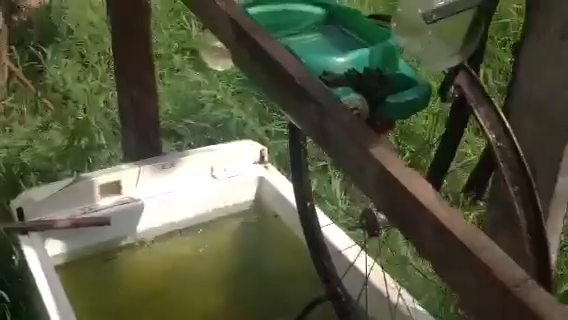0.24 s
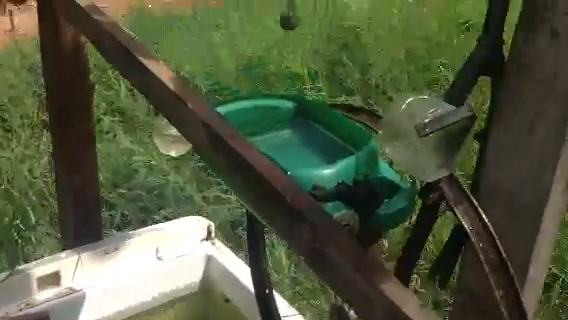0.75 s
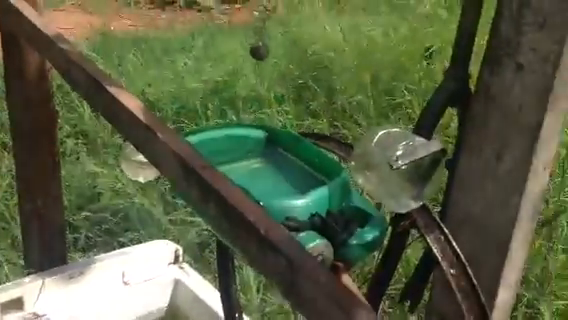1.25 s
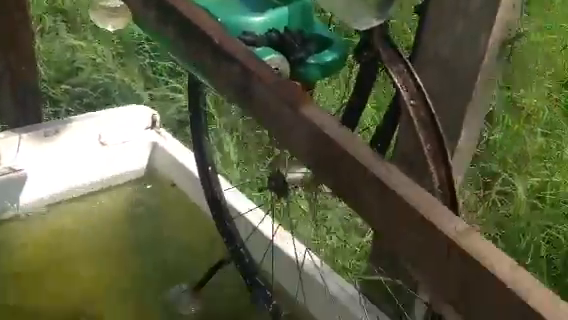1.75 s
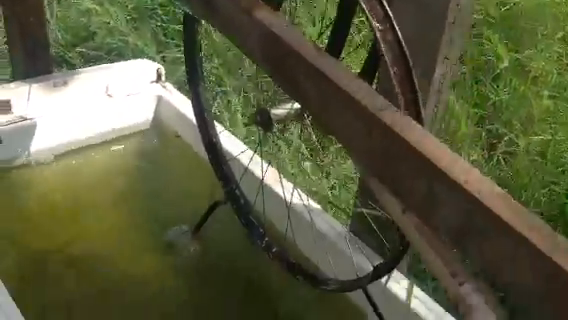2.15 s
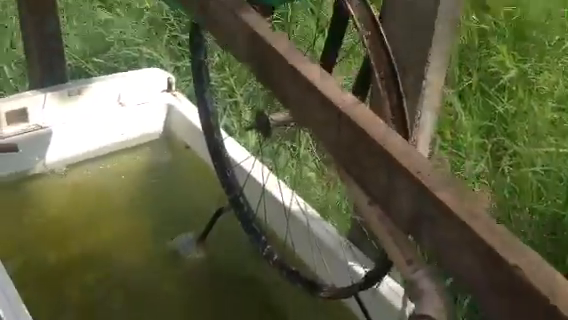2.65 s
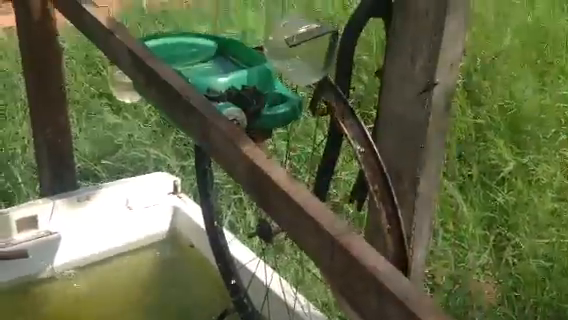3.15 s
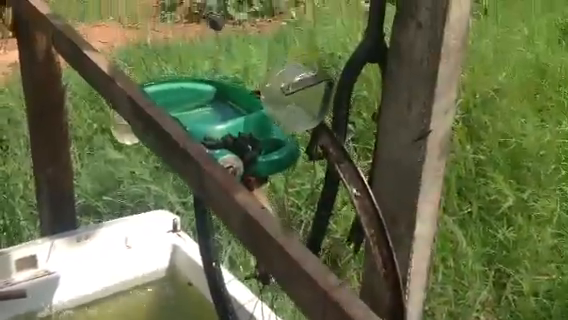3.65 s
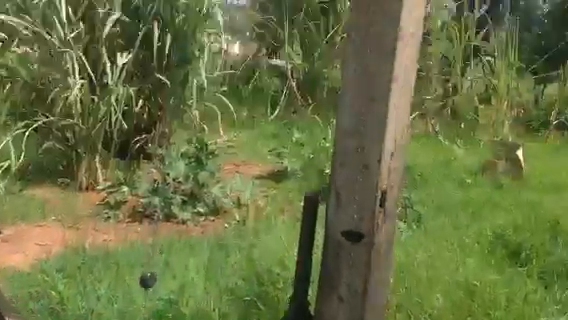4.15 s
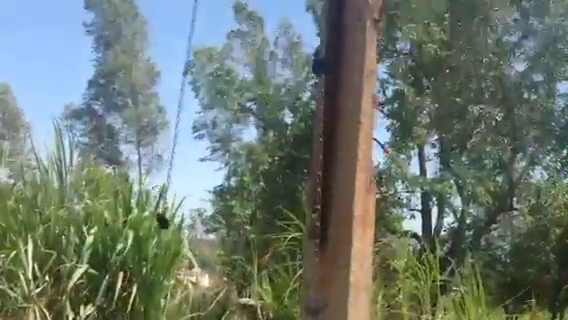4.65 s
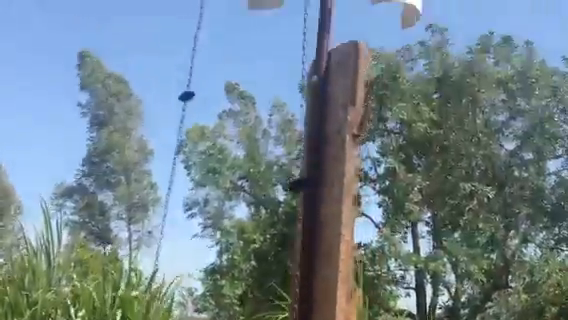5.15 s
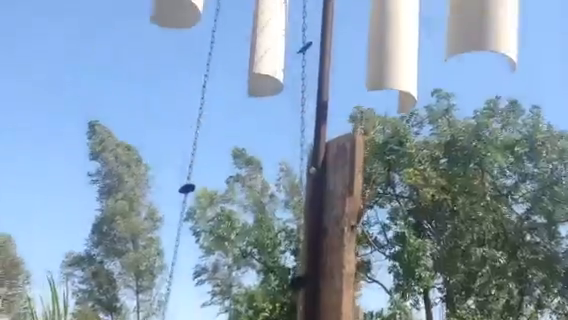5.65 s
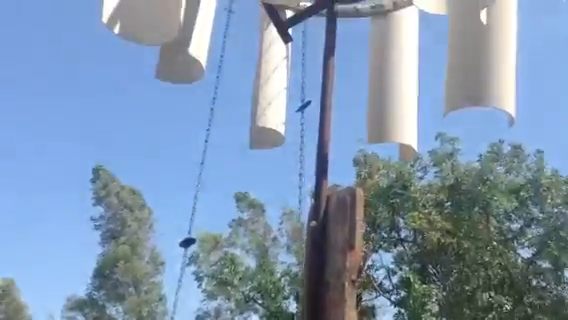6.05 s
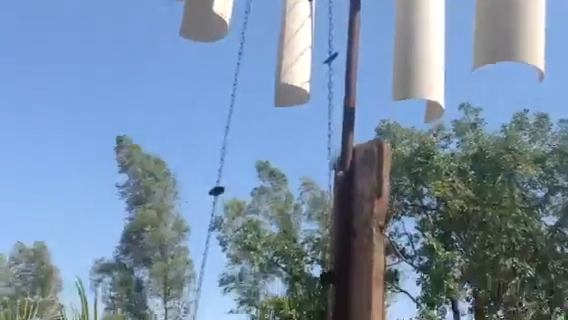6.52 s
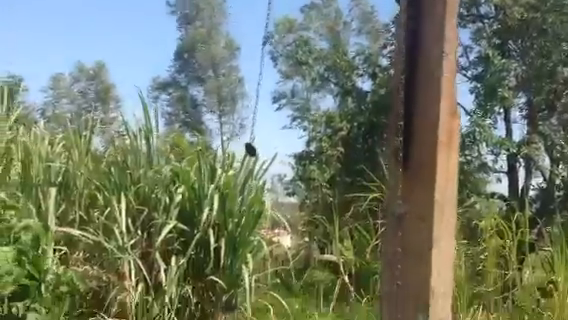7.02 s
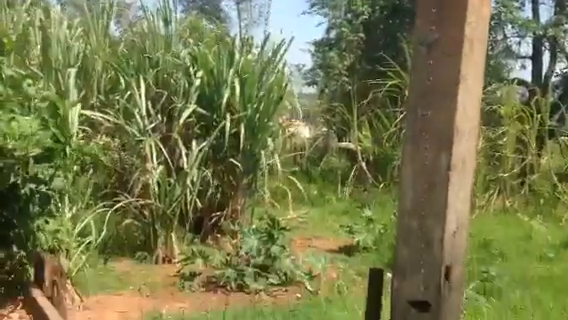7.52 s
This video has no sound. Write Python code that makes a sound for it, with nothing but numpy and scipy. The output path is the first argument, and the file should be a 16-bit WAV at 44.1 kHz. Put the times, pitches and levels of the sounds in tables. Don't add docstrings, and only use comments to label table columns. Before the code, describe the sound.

Open air, handheld microphone near a plastic tub. From 0 s water trickles in: a steady bright fizz, a soft low gurgle, ticking drops and small bubble plops, with a strong splash at 0.2 s and lesser ones near 0.7 and 1.0. A far bird gives a short, thin whistled call at 0.6, repeated at 2.0, 3.5, 4.7 and 6.8 s. The spray brightens around 1.6-1.8; another sharp splash comes at 2.6. Low wind bumps begin lightly, build from 2.8 and become by far the loudest sound between 3.7 and 4.7, lumpy and fluttering, with a final hard thump at 5.5. The fizz drops at 3.75 as the microphone turns away. Leaves hiss and crackle around 4 s; hand creaks and snaps cluster at 4.8-5.2 and 5.8-5.9, with a splash at 5.3. Gusts weaken after 6.5, and leaves stir again near 7.7 as the water returns slightly.

```python
import sys
import numpy as np
from scipy import signal
from scipy.fft import rfft, irfft, next_fast_len
from scipy.io import wavfile
from scipy.ndimage import uniform_filter1d, map_coordinates

SR = 44100
rng = np.random.default_rng(int(sys.argv[2]) if len(sys.argv) > 2 else 0)


def to_linear_factor(level_db):
    exponent = np.asarray(level_db, float) / 20
    return 10 ** exponent


def wav_record(signal):
    frames = np.transpose(np.atleast_2d(signal))
    bounded = np.clip(frames, -1, 1)
    quanta = np.round(bounded * 32767).astype(np.int16)
    wavfile.write(sys.argv[1], SR, quanta)


N = 343098
TOP_HZ = 15400

# time in seconds, change of the spray in dB.
AIM = [(0.0, 0.5), (0.27, -1.5), (1.26, -1.5), (1.53, -2.5), (1.6, -1.5), (1.83, -1.5), (2.0, -1.5),
       (3.59, -3.5), (3.73, -2), (3.77, -10), (4.69, -10), (6.47, -11.5), (7.45, -11), (7.78, -8)]
# crest in seconds, buffet level in dB, length in seconds, brightness in dB.
GUSTS = [(0.216, -44.5, 0.058, -22), (0.869, -55, 0.073, -10), (1.121, -57, 0.048, -8),
         (1.497, -37.5, 0.041, -11), (1.919, -41.5, 0.05, -23), (2.092, -41, 0.032, -18),
         (2.338, -37.5, 0.057, -25), (2.767, -30, 0.084, -23), (2.978, -35.5, 0.12, -23),
         (3.122, -29.5, 0.11, -10), (3.183, -29.5, 0.052, -8.5), (3.328, -31, 0.13, -12),
         (3.592, -26.5, 0.074, -18), (3.873, -23, 0.12, -8.5), (3.99, -24.5, .12, -2),
         (4.115, -29.5, 0.1, -4.5), (4.414, -22, 0.075, -3.5), (4.62, -22, 0.12, -3.5),
         (4.857, -26, 0.055, -9.5), (4.955, -30, .05, -9), (5.226, -30, 0.11, -9.5),
         (5.504, -19.5, 0.091, -7), (6.18, -40.5, 0.053, -12), (6.3, -41, 0.14, 0),
         (6.475, -24.5, 0.037, -7), (6.821, -43.5, 0.055, -18), (7.049, -40.5, 0.043, -24),
         (7.198, -40, 0.065, -10), (7.377, -34.5, 0.028, -5.5), (7.76, -37, 0.036, -13)]


def unit(x):
    return x / np.sqrt(np.mean(x ** 2) + 1e-20)


def curves(rows):
    s, *cols = np.transpose(rows)
    return [np.interp(np.arange(N) / SR, s, c) for c in cols]


def wobble(rate):
    knots = rng.standard_normal(int(N * rate / SR) + 4)
    return map_coordinates(knots, [np.arange(N) * rate / SR])


def coloured(x, spectrum):
    size = next_fast_len(N + 8192)
    hz, db = np.transpose(spectrum)
    gain_db = np.interp(np.log(np.fft.rfftfreq(size, 1 / SR) + 1), np.log(hz), db)
    return unit(irfft(rfft(x, size) * to_linear_factor(gain_db), size)[:N])


def patchy(depth_db):
    z = signal.stft(rng.standard_normal(N), nperseg=256)[2]
    field = uniform_filter1d(rng.standard_normal(z.shape), size=9, axis=0)
    field = uniform_filter1d(field, size=12, axis=1)
    return signal.istft(z * to_linear_factor(depth_db * unit(field)), nperseg=256)[1][:N]


def rings(s, db, hz, cycles, rise, glide, size):
    t = np.arange(size) / SR
    age = t * np.asarray(hz)[:, None] / cycles
    tone = np.sin(2 * np.pi * cycles * age * (1 + glide * age))
    wave = tone * np.exp(-age) * (1 - np.exp(-age / rise))
    at = np.round(np.asarray(s) * SR).astype(int)[:, None] + np.arange(size)
    return np.bincount(at.ravel(), (to_linear_factor(db)[:, None] * wave).ravel(), N + size)[:N]


def shower(count, hz, spread, size_db, cycles, glide, size):
    pick = rng.random((count, 2))
    pitch = np.clip(hz * np.exp(spread * rng.standard_normal(count)), 100, SR / 3)
    rank = np.minimum(-np.log(1 - pick[:, 1]), 4)
    return unit(rings(pick[:, 0] * N / SR, size_db * rank, pitch, cycles, 0.5, glide, size))


def puffs(s, db, hz, cycles):
    k = np.arange(-1300, 1300)
    turns = k / SR * hz[:, None]
    start = rng.random((len(s), 1))
    wave = to_linear_factor(db)[:, None] * np.exp(-(turns / cycles) ** 2) * np.cos(2 * np.pi * (turns + start))
    at = np.round(s * SR).astype(int)[:, None] + k
    return np.bincount(at.ravel(), wave.ravel(), N)[:N]


def swells(s, db, length):
    fall_db, rise_share = 11, 0.85
    t = np.arange(0, N + 64, 64) / SR - np.asarray(s)[:, None]
    away = np.where(t < 0, -t / rise_share, t) / np.asarray(length)[:, None]
    power = np.sum(to_linear_factor(2 * (np.asarray(db)[:, None] - fall_db * away)), axis=0)
    return np.interp(np.arange(N), np.arange(len(power)) * 64, 10 * np.log10(power + 1e-12))


def joined(a_db, b_db):
    return 10 * np.log10(to_linear_factor(2 * a_db) + to_linear_factor(2 * b_db))


def water():
    # pitch in Hz, level in dB.
    spray_tone = [(2500, -16), (4500, -6.5), (6500, -3), (9000, 0.5), (11500, 0), (13500, -2.5),
                  (15500, -6)]
    gurgle_tone = [(120, -8), (300, 0.5), (420, 2), (540, 3), (750, -1.5), (1100, -3), (1550, -3),
                   (1750, -8.5), (2500, -46)]
    # start in seconds, level in dB, pitch in Hz.
    bubbles = [(0.056, -44.5, 1350), (0.329, -49, 1270), (0.349, -49, 1016), (0.489, -49, 1075),
               (0.628, -49, 1200), (0.657, -46, 1160), (0.761, -50, 1350), (0.912, -50, 960),
               (1.055, -51, 1940), (1.333, -46.5, 1120), (1.354, -52, 1600), (1.5, -47, 970),
               (1.557, -46, 2640), (2.08, -50, 1350), (2.213, -48, 1270), (2.294, -46, 1010),
               (2.387, -47, 1380), (2.439, -49, 1460), (2.547, -48, 1150), (2.832, -51, 1210),
               (2.97, -52, 1400), (3.583, -43.5, 2360), (3.722, -47, 1420), (4.102, -51, 1440),
               (4.752, -49, 1720), (4.848, -47, 838), (5.951, -48, 1400), (6.468, -54, 1024),
               (7.748, -46.5, 950),
               (.079, -52, 1480), (.137, -49.5, 1300), (.472, -56, 1340), (.51, -55, 1270),
                     (1.07, -55, 1180), (1.407, -50, 1000), (1.69, -56, 1260), (1.727, -54, 1350),
                     (1.807, -53, 1260), (2.308, -51, 1370), (2.669, -56, 1260), (3.524, -55, 1100),
                     (6.273, -55, 1540), (6.784, -56, 1270)]
    # start in seconds, level in dB, pitch in Hz, life in cycles.
    tub_ring = (1.495, -45, 485, 32)

    aim_db, = curves(AIM)
    droplets = shower(count=1800, hz=9450, spread=0.27, size_db=6.0, cycles=0.89, glide=0, size=48)
    fizz = unit(coloured(patchy(0.93), spray_tone) + to_linear_factor(-12.0) * droplets)
    fizz_db = -47.5 + aim_db + 0.77 * wobble(9) + 0.61 * wobble(35)

    small_bubbles = shower(count=900, hz=1100.5, spread=0.3, size_db=3.0, cycles=7.7, glide=0.015, size=1400)
    gurgle = unit(coloured(patchy(0.73), gurgle_tone) + to_linear_factor(-9.0) * small_bubbles)
    gurgle_db = -52.5 + 0.22 * aim_db

    s, db, hz = np.transpose(bubbles)
    plops = rings(s, db + 8.5, hz * 0.97, cycles=8.1, rise=0.44, glide=0.016, size=2200)
    s, db, hz, cycles = tub_ring
    plops += rings([s], [db], [hz], cycles, rise=0.12, glide=0, size=8000)
    return to_linear_factor(fizz_db) * fizz + to_linear_factor(gurgle_db) * gurgle + plops


def ticks():
    # start in seconds, level in dB, pitch in Hz.
    drops = [(0.128, -49, 4150), (0.181, -47.5, 3060), (0.267, -50, 7920), (0.555, -47, 5860),
             (0.854, -38.5, 9990), (1.017, -49, 11370), (1.358, -49, 11020), (1.466, -43, 9990),
             (1.499, -46, 5000), (1.575, -47, 9990), (1.812, -45, 9650), (2.035, -40, 14810),
             (2.106, -42, 11400), (2.117, -47, 11500), (2.623, -37, 10680), (2.835, -37, 8200),
             (3.278, -49, 8960), (3.333, -47, 8610), (3.789, -48, 9550), (3.899, -55, 9650),
             (3.965, -50, 10680), (4.498, -51, 8800), (4.733, -49.5, 6890), (4.75, -53, 10340),
             (5.007, -53.5, 2790), (5.069, -54, 3100), (5.524, -51, 6600), (5.852, -54, 5510),
             (6.003, -55, 4820), (6.501, -54, 5170)]
    # time in seconds, peak in dB, pitch in Hz.
    specks = [(0.089, -34, 10070), (0.099, -35, 7428.0), (0.166, -42, 10026.0), (0.187, -37, 9595.0),
              (0.206, -35, 8206.0), (0.545, -40.0, 7927.0), (0.87, -37, 6760.0), (1.289, -40.0, 8791.0),
              (1.316, -42.0, 8650.0), (1.598, -38.0, 9279.0), (1.618, -39.0, 10204.0), (1.708, -35, 9472.0),
              (1.961, -40.0, 11820.0), (1.995, -40.0, 9775.0), (2.352, -43, 7682.0), (2.639, -38, 9202.0),
              (2.731, -37, 9924.0), (2.749, -39, 9071.0), (2.846, -41.0, 8479.0), (2.974, -38, 11998.0),
              (2.992, -40.0, 8563.0), (3.107, -38, 11079.0), (3.198, -39, 9298.0), (3.688, -40.0, 8301.0),
              (3.725, -40, 9877.0), (3.78, -42, 7427.0), (3.856, -43, 9387.0), (4.0, -44.0, 8222.0),
              (4.176, -45.0, 7680.0), (4.19, -44, 11186.0), (4.201, -46.0, 6801.0), (4.323, -49, 8119.0),
              (4.524, -46.0, 7568.0), (4.574, -45, 7555.0), (4.696, -43, 10157.0), (4.888, -47.0, 11253.0),
              (4.933, -48.0, 9530.0), (5.017, -45.0, 6307.0), (5.157, -47, 6755.0), (5.457, -50, 8089.0),
              (6.213, -50, 7148.0), (6.256, -47.0, 6656.0), (6.275, -47.0, 9561.0), (6.51, -49.0, 10091.0),
              (6.783, -49.0, 10014.0), (6.837, -48.0, 7615.0), (7.149, -49.0, 10051.0),
              (7.209, -48.0, 10713.0), (7.316, -46.0, 9610.0), (7.496, -46.0, 11640.0)]
    # start in seconds, peak in dB, pitch in Hz.
    splashes = [
        (0.1795, -19.5, 10000),
        (0.651, -27, 8250),
        (0.9847, -28, 9900),
        (2.582, -23, 11700),
        (5.262, -25, 11500),
        (7.7484, -47, 8270),
    ]
    # start in seconds, peak in dB, pitch in Hz.
    snaps = [(3.705, -37, 4950), (4.496, -35, 5750), (4.7666, -36, 3050), (4.777, -38, 2940),
             (4.784, -34, 3000), (4.797, -34, 3500), (4.808, -35, 2130), (4.825, -34, 2520),
             (4.838, -36, 3500), (4.9994, -38, 4020), (5.1307, -30, 3150), (5.1404, -38, 3610),
             (5.1645, -30.5, 3180), (5.18, -30, 5400), (5.1977, -28, 5260), (5.2609, -37, 3790),
             (5.7966, -32.5, 2000), (5.899, -32, 2890), (5.9264, -27, 4640), (6.7371, -48, 4810),
             (7.756, -38, 2470)]

    s, db, hz = np.transpose(drops)
    out = rings(s, db + 11, hz, cycles=hz[:, None] * 0.00091, rise=0.073, glide=0, size=256)
    second_hz = np.clip(hz * rng.uniform(0.69, 1.2, len(s)), 0, TOP_HZ)
    out += rings(s, db + 8.0, second_hz, cycles=4.6, rise=0.053, glide=0, size=256)

    s, db, hz = np.transpose(specks)
    out += rings(s - 0.0003, db + 7.0, hz, cycles=2.6, rise=0.08, glide=0, size=128)

    s, db, hz = np.transpose(splashes)
    for shift in (0.7, 0.85, 0.99, 1.15, 1.35):
        late = rng.uniform(0, 0.00028, len(s))
        part_hz = np.clip(hz * shift, 0, TOP_HZ)
        out += rings(s + late, db - 7.0, part_hz, cycles=4.0, rise=0.09, glide=0, size=256)

    s, db, hz = np.transpose(snaps)
    out += rings(s, db + 13.5, np.sqrt(hz * 6000), cycles=0.26, rise=0.12, glide=0, size=128)
    rattle = rings(s + 0.0005, db - 6, hz, cycles=3.1, rise=0.2, glide=0, size=256)
    return out + rattle


def eddies():
    # time
    # in seconds, peak in dB, pitch in Hz.
    lone_eddies = [(0.135, -37, 153), (0.449, -36, 170), (1.305, -39.5, 164), (1.536, -31.5, 175),
                   (1.72, -35.5, 181), (1.825, -33, 171), (1.865, -36, 186), (1.993, -39, 169),
                   (2.229, -31.5, 212), (2.384, -32.5, 171), (2.802, -24, 240), (3.062, -27, 223),
                   (3.605, -19, 208), (3.739, -18.5, 286), (3.832, -14, 247), (3.905, -15.5, 273),
                   (4.372, -13.5, 216), (4.558, -11.5, 241), (5.505, -9, 272), (5.595, -22, 220),
                   (5.749, -31.5, 184), (5.865, -30, 207), (5.905, -27.5, 304), (6.083, -27.5, 192),
                   (6.354, -24.5, 250), (6.425, -28, 212), (6.531, -26, 220), (6.79, -29.5, 208),
                   (7.23, -30.5, 200), (7.285, -29.5, 186)]
    crowding_eddies = [(1.51, -27, 175.0), (2.063, -36.0, 183.0), (2.823, -26, 230), (3.086, -33, 221.0),
                       (3.113, -25.5, 249.0), (3.204, -26, 270.0), (3.234, -28.0, 175), (3.341, -24.5, 219),
                       (3.383, -23.5, 248), (3.518, -28, 193), (3.561, -22.0, 211.0), (3.623, -23.5, 174.0),
                       (3.667, -23, 193.0), (3.716, -23, 230.0), (3.794, -20.5, 217.0), (3.812, -20, 231.0),
                       (3.853, -22, 285), (3.967, -24, 240.0), (4.008, -19.0, 228), (4.024, -23, 245.0),
                       (4.061, -22, 211.0), (4.1, -21, 186), (4.147, -17, 198.0), (4.163, -32, 217.0),
                       (4.203, -22, 228.0), (4.224, -24, 250.0), (4.304, -22.5, 201.0), (4.319, -22, 248.0),
                       (4.339, -24, 198.0), (4.432, -17, 265.0), (4.448, -15, 255.0), (4.467, -22, 191.0),
                       (4.53, -16, 249.0), (4.578, -16, 174), (4.599, -21.0, 260), (4.651, -18, 297.0),
                       (4.687, -21, 250), (4.705, -22.0, 198), (4.737, -19, 249.0), (4.974, -23.5, 177.0),
                       (5.059, -24.5, 200.0), (5.079, -29, 225.0), (5.19, -23, 196.0), (5.21, -20.5, 220.0),
                       (5.233, -27, 227), (5.249, -24.0, 213.0), (5.269, -24, 221.0), (5.334, -21, 276),
                       (5.474, -16, 256), (5.531, -16.5, 238), (5.543, -17, 254.0), (5.793, -32.5, 192.0),
                       (5.931, -30, 184.0), (6.287, -25.0, 213), (6.321, -29.0, 202.0), (6.454, -20, 222),
                       (6.586, -29, 214), (6.722, -29, 217), (6.831, -30.5, 205), (7.363, -32, 246.0)]
    sharp_flicks = [(3.183, -31, 474.0), (3.205, -37.0, 486.0), (3.584, -39, 480.0), (3.706, -34, 625),
                    (3.739, -26, 474.0), (3.806, -32, 481.0), (3.827, -24, 497.0), (3.863, -31, 489.0),
                    (3.903, -17.5, 475), (3.916, -24, 526.0), (3.945, -32, 570.0), (3.954, -33, 572.0),
                    (3.966, -19, 557.0), (3.982, -24, 570), (3.994, -32, 657.0), (4.016, -27, 506.0),
                    (4.047, -29.0, 484.0), (4.078, -26, 570.0), (4.103, -29.0, 471.0), (4.118, -21, 492.0),
                    (4.13, -22, 515), (4.163, -32, 554), (4.223, -23.5, 530.0), (4.258, -29.5, 491.0),
                    (4.362, -31, 619.0), (4.377, -22, 565.0), (4.387, -27.0, 547.0), (4.414, -29, 520.0),
                    (4.426, -21, 566.0), (4.437, -27, 590.0), (4.45, -28, 518.0), (4.464, -25, 498.0),
                    (4.522, -19.5, 508.0), (4.561, -29, 532.0), (4.571, -21, 542.0), (4.59, -25, 500),
                    (4.615, -19, 500), (4.635, -21, 531.0), (4.65, -23.0, 545.0), (4.668, -18.5, 583),
                    (4.703, -34.0, 530.0), (4.727, -33, 489.0), (4.855, -24, 580), (4.938, -33, 543.0),
                    (4.998, -33, 476.0), (5.21, -35, 491.0), (5.226, -35, 529.0), (5.245, -41, 464.0),
                    (5.258, -35, 487.0), (5.477, -30, 596.0), (5.501, -14.5, 518.0), (5.517, -23.0, 485),
                    (5.525, -25, 555.0), (5.582, -25, 511.0), (6.285, -33.5, 588.0), (6.356, -36, 561.0),
                    (6.453, -30, 518.0), (6.468, -27, 491.0), (6.479, -31, 517.0), (7.378, -39, 557)]

    s, db, length, _ = np.transpose(GUSTS)
    crest_db = db + 9.5
    crest_hz = 270 + 3 * crest_db
    out = puffs(s, crest_db - 33 * length, crest_hz, cycles=0.8)
    s, db, hz = np.transpose(lone_eddies)
    out += puffs(s, db - 0.5, hz, cycles=0.92)
    s, db, hz = np.transpose(crowding_eddies)
    out += puffs(s, db - 1.0, hz, cycles=0.96)
    s, db, hz = np.transpose(sharp_flicks)
    return out + puffs(s, db - 1.5, 0.86 * hz, cycles=0.95)


def wind():
    # time in seconds, buffet level in dB.
    breeze = [(0.0, -67), (0.3, -55), (0.55, -63.5), (1.35, -58.5), (1.65, -53.5), (2.0, -49.5),
              (2.6, -46.5), (2.9, -41.5), (3.48, -34), (3.62, -30), (4.2, -28.5), (4.75, -35), (5.35, -35),
              (5.7, -41.5), (6.2, -40), (6.6, -40.5), (7.3, -46.5), (7.7, -50.5)]
    # middle in seconds, depth in dB, half length in seconds.
    lulls = [(1.07, 8, .03), (2.29, 13, 0.024), (2.737, 16, 0.03), (3.158, 14, 0.016), (3.254, 9, 0.019),
             (3.473, 10, 0.064), (3.777, 8, 0.01), (4.304, 16, 0.025), (4.805, 5, 0.016), (5.41, 9, 0.054),
             (6.239, 10, 0.021), (6.668, 13, 0.04), (6.94, 9, 0.064)]
    # pitch in Hz, level in dB.
    deep_tone = [(20, -34), (40, -25), (60, -8), (85, 0.5), (120, 12.5), (200, -3), (400, -40.5)]
    slow_tone = [(30, -62), (60, -41), (105, -29.5), (150, 2), (210, 1), (290, -4.5), (400, -17),
                 (700, -84)]
    fast_tone = [(150, -54), (260, 1.5), (350, 4.5), (450, -1), (630, -19.5), (900, -32), (1500, -73)]
    fine_tone = [(350, -20), (550, -3.5), (700, -2.5), (1000, -14.5), (1400, -32), (2000, -54)]

    breeze_db, = curves(breeze)
    s, db, length, bright_db = np.transpose(GUSTS)
    t = np.arange(N) / SR
    still_db = sum(depth_db * np.exp(-((t - at) / half) ** 2) for at, depth_db, half in lulls)
    buffet_db = joined(breeze_db, swells(s, db, length)) - still_db
    fast_db = joined(breeze_db - 9.5, swells(s, db + bright_db, length)) - still_db
    fine_db = 2.13 * (fast_db + 33.0) - 48.0
    gusting = 1 / (1 + np.exp(-(buffet_db + 43.5) / 2.4))

    lumps = 1.3 * wobble(18) + 1.57 * wobble(55)
    spikes = 1.2 * lumps + 3.17 * wobble(90)
    deep_db = 0.59 * buffet_db - 25 + 0.89 * lumps + 1.14 * wobble(7)
    deep = to_linear_factor(deep_db) * coloured(rng.standard_normal(N), deep_tone)
    slow = unit(to_linear_factor(lumps) * coloured(rng.standard_normal(N), slow_tone))
    fast = unit(to_linear_factor(spikes) * coloured(rng.standard_normal(N), fast_tone))
    fine = unit(to_linear_factor(1.5 * spikes) * coloured(rng.standard_normal(N), fine_tone))
    slow_part = to_linear_factor(buffet_db - 0.5 - 2.15 * gusting) * slow
    sharp_part = gusting * (to_linear_factor(fast_db) * fast + to_linear_factor(fine_db) * fine)
    return deep + slow_part + sharp_part + eddies()


def leaves():
    # pitch in Hz, level in dB.
    leaf_tone = [(1200, -33), (1800, -2), (3000, -0.5), (3700, -2.5), (5500, -0.5), (7500, -1.5),
                 (9000, -11), (15500, -11.5)]
    # crest in seconds, level in dB, length in seconds.
    stirs = [
        (3.73, -54.5, .3),
        (4.15, -55, .6),
        (4.753, -61, 0.33),
        (7.624, -54.5, 0.15),
        (7.78, -56, 0.32),
    ]

    aim_db, = curves(AIM)
    leaves_db = joined(-51.5 + 0.52 * aim_db, swells(*np.transpose(stirs)))
    crackle = shower(count=1500, hz=4550, spread=0.63, size_db=4.5, cycles=0.99, glide=0, size=64)
    rustle = unit(coloured(patchy(0.8), leaf_tone) + to_linear_factor(-12.5) * crackle)
    return to_linear_factor(leaves_db + 0.52 * wobble(12) + 0.42 * wobble(30)) * rustle


def bird():
    # start in seconds, wait for the last note in seconds, high note length in seconds and pitch in Hz.
    calls = [
        (0.585, .186, .19, 4760),
        (2.007, .17, .12, 4720),
        (3.471, 0.18, .11, 4710),
        (4.738, .14, .13, 4740),
        (6.779, .118, .14, 4820),
    ]
    # level in dB of the low note, the pip, the high note and the last note.
    efforts = [
        (-55, -59, -53.5, -52),
        (-55, -56, -54, -54),
        (-52, -61, -52, -53),
        (-52, -57, -56, -51),
        (-55, -63, -58.5, -50.5),
    ]

    notes = []
    for (s, wait, held, hz), (low_db, pip_db, high_db, last_db) in zip(calls, efforts):
        notes.append((s, 0.058, 2960, 3070, low_db))
        notes.append((s + 0.05, 0.055, 4680, 4680, pip_db))
        notes.append((s + wait - 0.045, held, hz, hz - 40, high_db))
        notes.append((s + wait, 0.1, 4130, 3900, last_db))

    out = np.zeros(N + SR)
    flutter, waver = to_linear_factor(4.5 * wobble(75)), 1.3 * wobble(140)
    for s, length, start_hz, end_hz, db in notes:
        at = round(s * SR)
        u = np.arange(round(length * SR)) / (length * SR)
        here = slice(at, at + len(u))
        glide_hz = start_hz + (end_hz - start_hz) * np.sqrt(u) / 1.51
        phase = 2 * np.pi * length * u * glide_hz + waver[here]
        tone = np.sin(phase) + to_linear_factor(-19) * np.sin(2 * phase)
        shape = np.sin(np.pi * u ** 0.41) ** 0.75
        out[here] += to_linear_factor(db + 2.5) * shape * unit(flutter[here]) * tone

    voice = out[:N]
    t = np.arange(SR // 3) / SR
    echo = rng.standard_normal(len(t)) * to_linear_factor(-60 * t / 0.44)
    echoed = signal.fftconvolve(voice, echo / np.linalg.norm(echo))[:N]
    return to_linear_factor(-1.5) * voice + to_linear_factor(-6) * echoed


def mist():
    # pitch in Hz, level in dB.
    mist_tone = [(6000, -40), (8200, -3), (10000, 0), (12000, -3), (14500, -30)]
    # crest in seconds, level in dB, length in seconds.
    surges = [
        (1.62, -56, .35),
        (1.78, -56, .3),
        (3.72, -60, .08),
    ]
    return to_linear_factor(swells(*np.transpose(surges))) * coloured(patchy(1.5), mist_tone)


def scene():
    return (water() + ticks() + wind() + leaves() + bird() + mist())[None]


def band_limit(x):
    return signal.sosfilt(signal.butter(12, 16260, fs=SR, output="sos"), x)


def record(dry):
    hz = np.fft.rfftfreq(N, 1 / SR)
    bass_cut = hz ** 2 / (hz ** 2 + 30 ** 2)
    kept = irfft(rfft(dry) * (hz < TOP_HZ) * bass_cut, N)
    return band_limit(kept)


dry = scene()
out = record(dry)
wav_record(out)
```